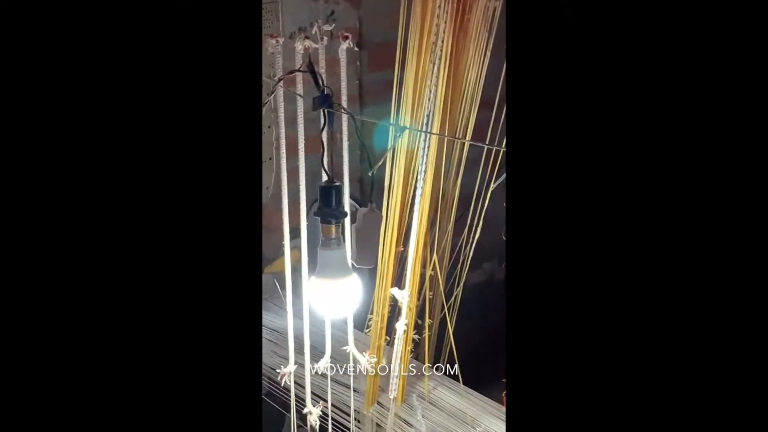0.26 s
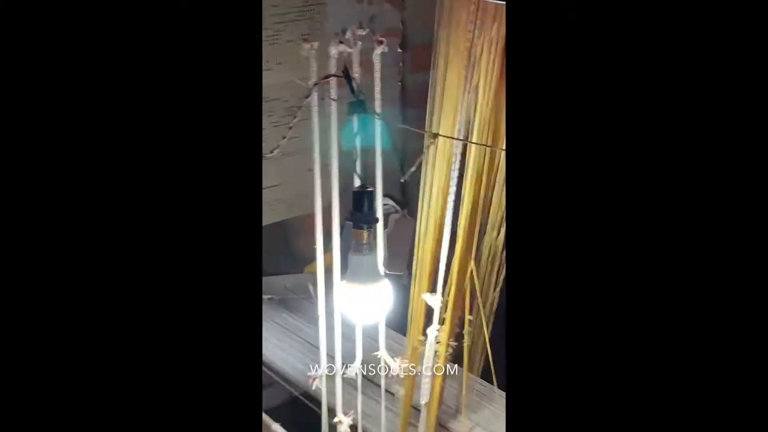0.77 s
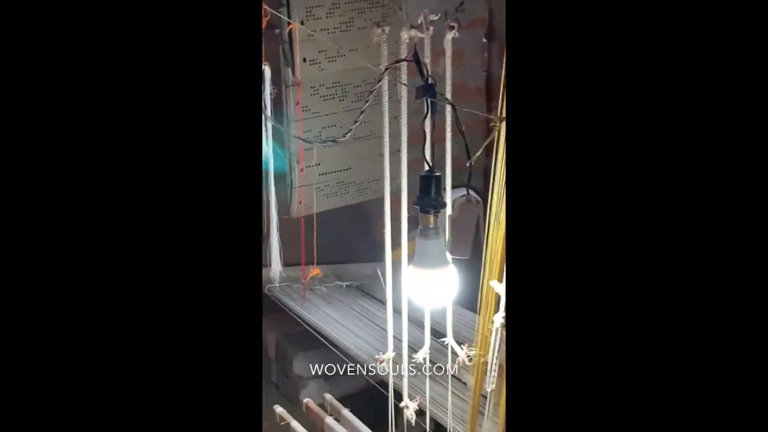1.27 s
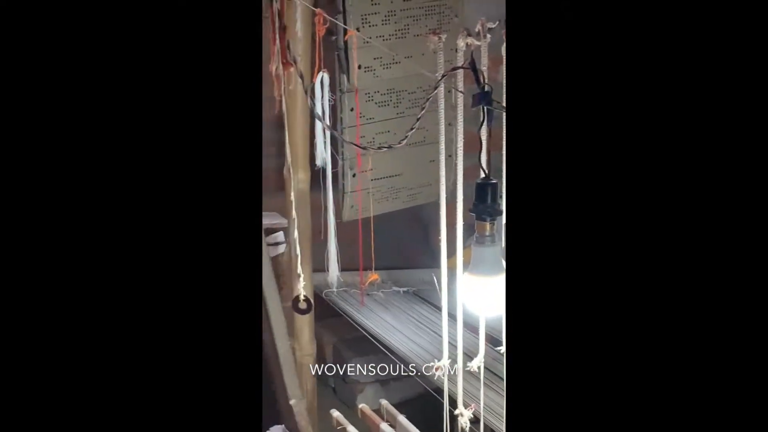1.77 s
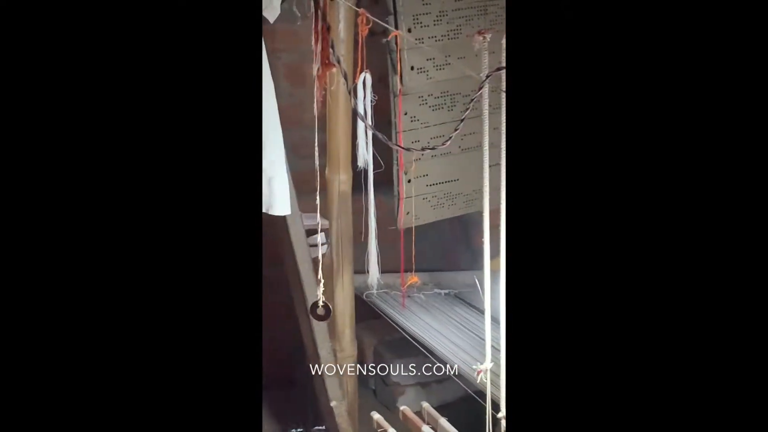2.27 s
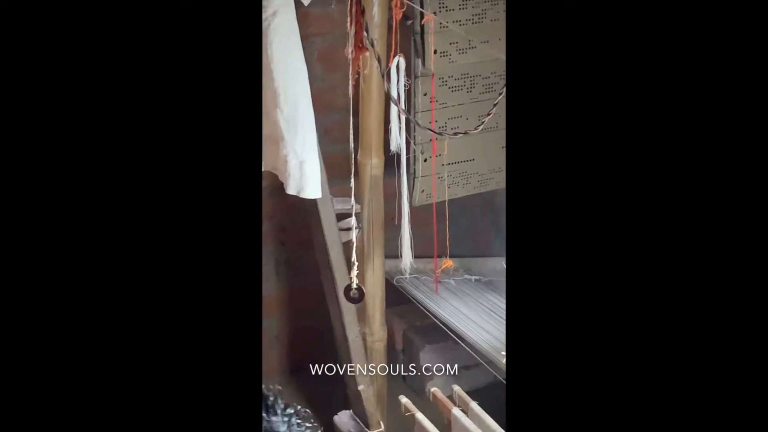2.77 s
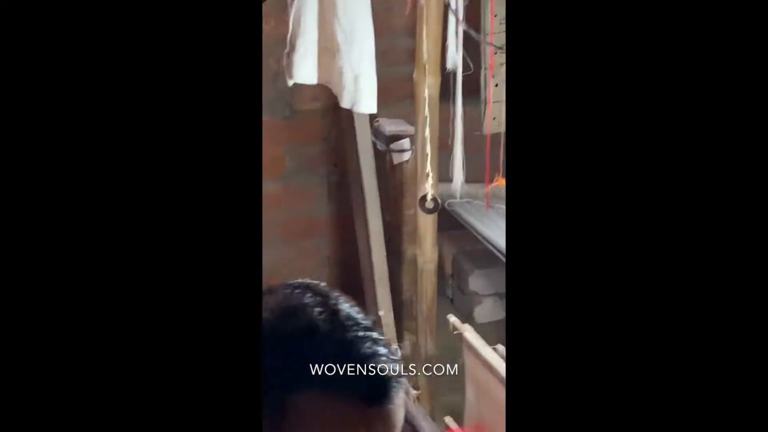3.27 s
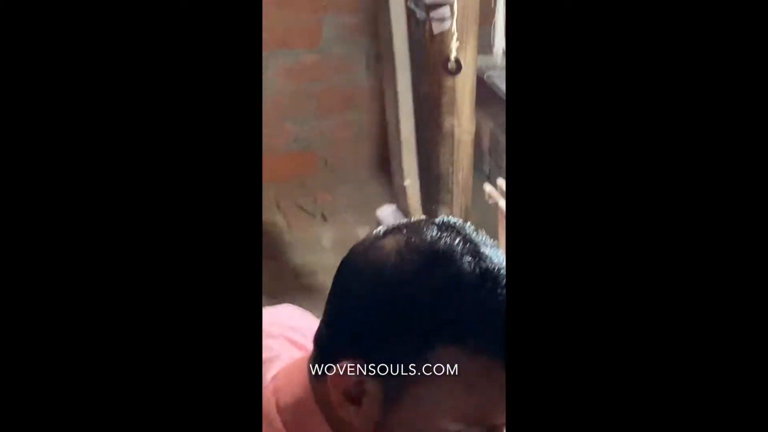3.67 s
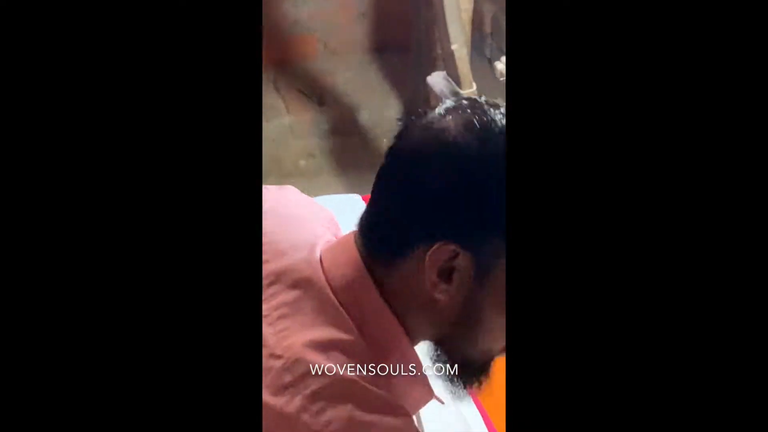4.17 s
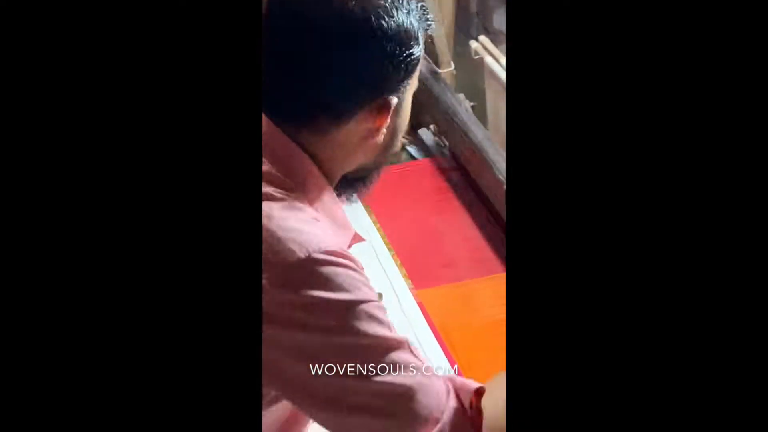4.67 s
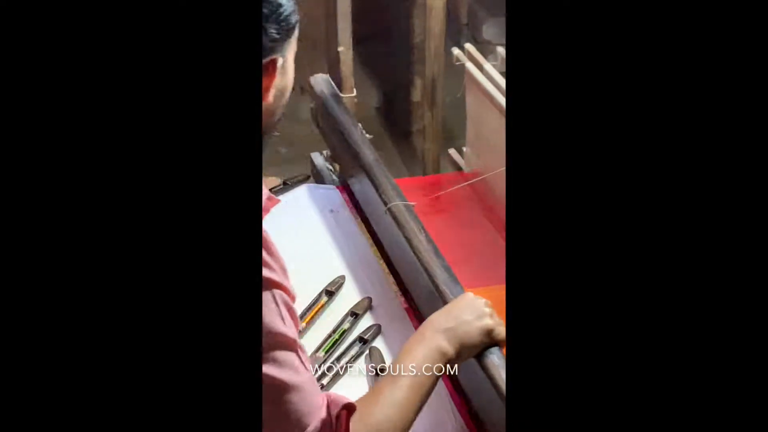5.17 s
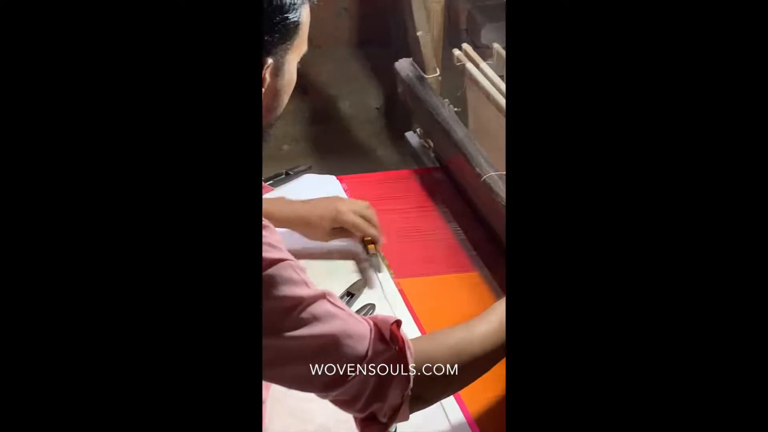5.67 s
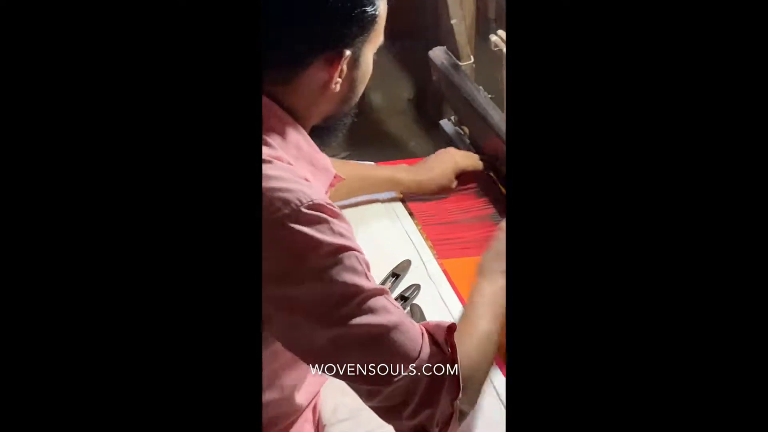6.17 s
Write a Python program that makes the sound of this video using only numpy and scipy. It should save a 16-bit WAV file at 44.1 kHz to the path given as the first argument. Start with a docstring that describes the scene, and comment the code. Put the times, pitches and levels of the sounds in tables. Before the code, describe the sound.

A wooden handloom is worked close by in a small brick workshop. Bright thread hiss swells into a heavy clattering blow with a low frame boom, then scattered knocks and a light metallic jingle. Another swish and clatter follow, then sparse sharp clacks, more jingling, and a busier final run of knocks and scrapes. Street rumble and faint motor hum stay underneath; a distant horn beeps weakly near the end. Handheld stereo microphone.

```python
"""Handloom in a brick workshop

A wooden handloom is worked indoors: warp threads hiss and scrape, beater, treadles and shuttles knock,
a taut cord squeals, small metal parts jingle and the frame booms. Outside a street rumbles, a motor hums
and a far horn sounds. Friction is filtered random grains, struck wood and metal are decaying modes,
frame and rumble are filtered noise, the hum is resonant noise and the horn a sum of sine orders."""
import sys
import numpy as np
from scipy import signal
from scipy.fft import rfft, irfft
from scipy.io import wavfile

SR = 44100
rng = np.random.default_rng(int(sys.argv[2]) if len(sys.argv) > 2 else 0)


def dump(signal):
    """Clip the signal to [-1, 1] and save it as 16-bit WAV at the path in sys.argv[1]."""
    limited = np.clip(np.atleast_2d(signal).T, -1, 1)
    pcm = np.round(limited * 32767).astype(np.int16)
    wavfile.write(sys.argv[1], SR, pcm)


N = 283122   # samples
HZ = np.maximum(np.arange(N // 2 + 1) * SR / N, 1)   # spectrum bins, kept off zero for the logarithm
TIME_S = np.arange(0, N + 20, 20) / SR   # envelopes are drawn at every 20th sample


def amp(db):
    """Level to linear amplitude: 20 dB is a factor of ten."""
    return 10 ** (np.asarray(db) / 20)


def rms_one(x):
    """Normalization by the root mean square, to unit rms."""
    return x / np.sqrt(np.mean(x ** 2) + 1e-20)


def at_hz(points, hz, axis=1):
    """Interpolation of one table column along a logarithmic frequency axis."""
    points = np.array(points)
    return np.interp(np.log(hz), np.log(points[:, 0]), points[:, axis])


def coloured(x, spectrum):
    """Spectral shaping: x is multiplied by a magnitude curve and brought to unit rms."""
    return rms_one(irfft(rfft(x) * amp(at_hz(spectrum, HZ)), N))


def band(x, low_hz, high_hz):
    """Band-pass filtering with Butterworth slopes."""
    return signal.sosfilt(signal.butter(2, [low_hz, high_hz], "band", fs=SR, output="sos"), x)


def drift(rate):
    """Slow random modulation of unit spread: noise through a double low-pass pole at rate hertz."""
    pole = np.exp(-80 * np.pi * rate / SR)   # at one value per 40 samples
    noise = rng.standard_normal(N // 40 + 2002)
    slow = signal.lfilter([1], [1, -2 * pole, pole * pole], noise)[2000:]
    return np.interp(np.arange(N) / 40, np.arange(len(slow)), rms_one(slow))


def grains(per_s, spread_db, size):
    """Stochastic impulse train: clicks of random time, strength and sign, at unit rms."""
    strength = amp(spread_db * np.minimum(rng.exponential(1, size), 5))
    signed = strength * rng.choice([-1, 1], size)
    return rms_one(signed * (rng.random(size) < per_s / SR) + 1e-9)


def ring(clicks, hz, t60):
    """Damped resonance: a unit click excites a sine of height 1 that loses 60 dB in t60 seconds."""
    decay = amp(-60 / (t60 * SR))
    turn = 2 * np.pi * min(hz, SR / 2.1) / SR
    return signal.lfilter([0, np.sin(turn)], [1, -2 * decay * np.cos(turn), decay * decay], clicks + 1e-18)


def gliding_ring(clicks, hz, t60):
    """Damped resonance of moving pitch: shift down, decay, shift back up."""
    turn = np.exp(2j * np.pi * np.cumsum(hz) / SR)
    return np.imag(turn * signal.lfilter([1], [1, -amp(-60 / (t60 * SR))], clicks / turn))


def swell(start, rise, hold, fall):
    """Envelope of height 1: a power-law rise, a hold, then exponential decay of 20 dB per fall time."""
    t = TIME_S - start
    return np.clip(t / rise, 0, 1) ** 0.86 * amp(-20 * np.clip((t - rise - hold) / fall, 0, 10))


def per_sample(envelope):
    """Linear interpolation of an envelope to every sample."""
    return np.interp(np.arange(N) / SR, TIME_S, envelope)


def street_rumble():
    """Broadband noise of fixed spectrum, its level wandering slightly."""
    # Each row: frequency in Hz, relative spectral density in dB.
    rumble_spectrum = [(25, -16), (35, -3), (70, -5), (120, 0), (170, 2.5), (300, -4.5), (620, -10.5),
                       (1450, -15.5), (2500, -57), (4300, -52), (7000, -45), (16000, -61)]
    rumble = coloured(rng.standard_normal(N), rumble_spectrum)
    return amp(-43.5 + 1.0 * drift(1.7)) * rumble


def motor_hum():
    """Narrow-band noise: random excitation of one resonance gives a wavering tone."""
    # A motor somewhere: frequency in Hz, bandwidth in Hz, rms level in dB.
    motor_resonance = (114, 11, -46.5)
    hz, width_hz, db = motor_resonance
    t60 = np.log(1000) / np.pi / width_hz   # bandwidth and decay time are reciprocal
    return amp(db) * rms_one(ring(rng.standard_normal(N), hz, t60))


def frame():
    """Low-frequency vibration: frame and floor boom as noise of about 45 to 100 Hz under swelling envelopes."""
    # Booms of frame and floor. Each row: start in seconds, level in dB.
    booms = [(0.9,-31.5),(1.16,-43),(1.74,-48),(2.7,-43.5),(2.83,-37),(2.96,-38.5),(3.47,-40.5),(3.93,-46),(4.18,-48.5),
             (4.6,-44),(4.82,-42),(5.08,-41),(5.3,-40.5),(5.56,-44),(5.92,-42),(6.08,-43)]
    rise_s, fall_s, steady_shake_db = .07, .22, -53   # fall: seconds per 20 dB
    level = amp(steady_shake_db) + sum(amp(db) * swell(s, rise_s, 0, fall_s) for s, db in booms)
    shake = band(band(rng.standard_normal(N), 45, 100), 42, 110)
    return per_sample(level) * rms_one(shake)


def threads():
    """Friction noise: thousands of tiny thread slips hiss, and sliding wood gives a duller scrape."""
    # Spectra of thread hiss and wood scrape. Each row: frequency in Hz, relative spectral density in dB.
    hiss_spectrum = [(1500, -22), (3000, -4), (4500, -1), (7000, 0), (10000, -2), (13000, -1), (16000, 0)]
    scrape_spectrum = [(200, -13), (500, 11), (1000, 15), (2000, 15.5), (3500, 10), (6000, -1),
                       (12000, -79)]
    # Slides of warp, shed and beater. Each row: start in seconds, rise in seconds, hold in seconds,
    # base time in seconds to fall 20 dB, thread hiss level in dB, wood scrape level in dB.
    slides = [(0.255,0.03,0.06,0.15,-66,-48),(0.52,0.16,0.069,0.18,-26.5,-39.5),(0.69,0.05,0.03,0.12,-28,-38),(0.764,0.014,0.035,0.09,-23,-36),
              (0.838,0.013,0.048,0.13,-23.5,-29.5),(1.0,.04,.01,.1,-39,-40),(1.05,0.012,0.05,.06,-23,-33),(1.1,.02,.03,.2,-32,-38),(1.15,0.093,.12,0.14,-26.5,-39),
              (1.49,0.017,0.0086,0.14,-44,-38),(1.647,.015,.04,0.23,-45,-51.5),(1.777,.1,.15,0.17,-43,-52),
              (2.23,0.046,0.047,1,-59,-56),(2.37,0.19,0.063,0.29,-25.5,-39),(2.684,0.04,0.03,0.27,-23,-35),(2.752,.01,.05,.2,-30,-29),
              (2.96,0.045,0.0091,0.13,-32,-40),(3.15,0.028,0.039,0.07,-42.5,-40.5),(3.2,.03,.05,.2,-52,-48),(3.33,0.05,.12,0.25,-55,-48),
              (3.5,.05,.08,.2,-60,-55),(3.6,0.042,0.14,0.6,-55,-48.5),(3.87,0.048,0.053,0.15,-53,-40.5),(4.098,0.006,.015,0.08,-40,-45),
              (4.152,.008,.003,0.05,-36,-55),(4.4,0.12,.1,0.12,-46,-59),(4.62,.05,.1,.3,-60,-60),(4.77,0.056,.03,0.4,-57,-59),
              (5.03,0.036,0.018,.2,-61,-51.5),(5.26,0.03,0.03,0.17,-48,-37),(5.535,0.015,0.045,0.1,-47.5,-52),
              (5.616,0.026,0.036,0.19,-23.5,-30.5),(5.82,.03,.04,0.2,-40,-39),(5.877,0.025,0.011,0.1158,-21.5,-24.5),
              (5.97,0.045,.04,0.18,-39,-39.5),(6.127,.01,.03,0.18,-38.5,-44.5)]
    rest_hiss_db, rest_scrape_db = -64, -58.5   # between slides the loom never quite rests
    scrape_lingers = 1.22   # the scrape's fall time against the hiss's
    bright_db, dulling, dull_above_hz = -25, 0.32, 8100   # dB lost at the top per dB below the bright level
    hiss_power, scrape_power = amp(rest_hiss_db) ** 2, amp(rest_scrape_db) ** 2
    for start, rise, hold, fall, hiss_db, scrape_db in slides:
        hiss_power = hiss_power + (amp(hiss_db) * swell(start, rise, hold, fall)) ** 2
        scrape_swell = swell(start, rise, hold, scrape_lingers * fall)
        scrape_power = scrape_power + (amp(scrape_db) * scrape_swell) ** 2
    hiss_level, scrape_level = np.sqrt(hiss_power), np.sqrt(scrape_power)

    slips = coloured(grains(9000, 1.3, size=N), hiss_spectrum)
    top = irfft(rfft(slips) / (1 + (dull_above_hz / HZ) ** 4), N)
    brightness = per_sample(np.minimum(hiss_level / amp(bright_db), 1) ** dulling)
    hiss = (slips - (1 - brightness) * top) * per_sample(hiss_level) * amp(2.34 * drift(13.6))
    scrape = coloured(grains(5000, 1.56, size=N), scrape_spectrum)
    return hiss + scrape * per_sample(scrape_level) * amp(2.7 * drift(17.2))


def knocks():
    """Impact excitation: a blow and the dying clatter of loose parts set wooden modes ringing."""
    # Each row: time in seconds, thud level in dB, ring frequency in Hz, ring strength in dB,
    # clatter t60 in seconds, low body level in dB, snap level in dB, crack level in dB,
    # gain of the crack's top octave in dB. The four part levels are nominal peaks.
    blows = [(0.236,-48,1170,-32,.25,-47,-58,-40,-6),(0.778,-34,1500,-34,.06,-45,-28,-18,0),(0.847,-26,1600,-26,.4,-42,-20,-24,-5),(0.868,-26,1500,-22,.2,-50,-40,-45,-5),
             (0.889,-16,1260,-32,.1,-18,-13,-28,-7),(0.8965,-10,1350,-32,.1,-10,-34,-33,-3),(0.905,-12,800,-34,.15,-19,-22,-35,-3),
             (0.919,-11,1100,-34,.2,-19,-37,-32,-5),(0.9245,-10,1040,-25,.09,-22,-34,-35,-3),(0.939,-20,1850,-34,.1,-22,-36,-40,-3),
             (0.961,-20,900,-38,.25,-22,-36,-37,-3),(0.984,-27,1000,-22,.15,-30,-45,-50,-3),
             (1.063,-32,1500,-34,.06,-45,-28,-18,0),(1.096,-23.5,1080,-32,.25,-29,-18,-25,-3),(1.237,-23,800,-24,.25,-24.5,-30,-32,1),
             (1.51,-15.5,1500,-32,.28,-29,-26.5,-31,-7),(1.549,-21,1400,-34,.3,-41,-46,-68,-3),(1.657,-33,1420,-32,.25,-42,-41,-35,-4),
             (2.712,-32,1100,-32,.2,-45,-23,-35,-3),(2.755,-24,2000,-38,.2,-45,-19,-30,-3),
             (2.761,-12,1050,-28,.1,-40,-10,-31,2),(2.766,-20,2500,-32,.12,-40,-14,-34,0),(2.774,-17,1050,-32,.2,-16,-22,-26,-5),(2.787,-20,1300,-34,.2,-15,-18,-40,-3),
             (2.8,-18,1600,-32,.25,-26,-17,-52,-3),(2.815,-19,1500,-36,.2,-20,-26,-45,-3),
             (2.847,-19,1500,-38,.2,-21,-21,-30,-8),(2.867,-21,1400,-38,.2,-22,-26,-36,-3),(2.992,-30,1020,-32,.25,-32,-28,-35,-1),
             (3.01,-29,2500,-24,.12,-40,-34,-45,-3),(3.079,-30,1400,-38,.15,-30,-45,-52,-3.5),(3.163,-35,974,-32,.25,-38,-35,-40,-3),(3.184,-35,970,-32,.15,-30,-27,-41,-5),
             (3.334,-37.5,1900,-32,.1,-43,-36,-58,-3),(3.352,-36,2200,-32,.12,-45,-35,-56,-3),(3.384,-31,885,-34,.2,-58,-32,-50,-8),(3.502,-23,825,-32,.25,-37,-57,-59.5,-3),
             (3.5255,-13,1180,-38,.22,-27,-48,-47,-5),(3.624,-36,1280,-32,.25,-32.5,-36,-49,-3),(3.699,-42,740,-32,.25,-48,-53,-55,-5),
             (3.754,-42,1800,-32,.1,-50,-46,-48,-3),(3.778,-34,2450,-24,.1,-52,-50,-58,-3),(3.817,-37,2450,-24,.1,-52,-52,-58,-3),
             (3.858,-31.5,1400,-32,.25,-52,-38,-48,-16),(3.868,-14,1460,-33,.25,-50,-14,-17.5,-21),
             (3.919,-16.5,1420,-33,.25,-49,-22,-15,-28),(3.937,-20.5,1590,-33,.25,-36.5,-21.5,-30,-20),(4.103,-25.5,1510,-30,.25,-36,-31,-30,-2),
             (4.113,-36,1500,-32,.06,-45,-31,-24,-3),(4.276,-36.5,1040,-32,.25,-40,-54,-56,-3),(4.443,-30,1500,-36,.18,-48,-33,-30,0),
             (4.567,-31,900,-38,.15,-39,-45,-38,-3),(4.583,-33,1300,-32,.15,-39,-45,-33,-3),(4.829,-47,1220,-32,.1,-37.5,-49,-45,-14),(5.155,-22,1050,-40,.2,-37,-57,-66,-8),
             (5.179,-17.5,1250,-42,.17,-34,-52,-65,-8),(5.234,-19,1600,-38,.1,-36,-22,-23,-13),(5.235,-14,760,-20,.13,-40,-40,-50,-9),(5.274,-16,1300,-36,.2,-21,-18,-22.5,-13),
             (5.276,-20,2850,-26,.1,-40,-30,-40,-12),(5.284,-15,1100,-36,.25,-20,-19,-32,-12),(5.3,-16,800,-34,.25,-17,-34,-34,-12),(5.318,-19,1200,-36,.25,-28,-34,-40,-12),
             (5.338,-21,1200,-32,.2,-26,-36,-45,-12),(5.36,-26,1100,-32,.25,-30,-48,-60,-8),(5.447,-33,710,-32,.2,-36,-48,-65,-8),
             (5.544,-43,738,-32,.25,-44,-39,-52,-3),(5.614,-27,1510,-32,.25,-45,-30,-48,-3),(5.643,-20,1590,-32,.25,-34,-23,-17,-2),
             (5.698,-21.5,1550,-32,.2,-30,-15,-27,-8),(5.891,-25.5,1350,-32,.2,-30,-18,-21,-11),(5.9145,-18,1510,-32,.2,-23,-17,-12,-7),
             (6.132,-28,1390,-32,.2,-44,-36,-23,1),(6.168,-50,1440,-32,.15,-42,-39,-24,3),(6.187,-15,1500,-36,.14,-59,-25.5,-22,-9),
             (6.199,-20,1250,-30,.15,-40,-43,-54,-3),(6.268,-31,1280,-36,.1,-45,-50,-27,-6)]
    # Modes of the wood. Each row: frequency in Hz, relative level in dB, t60 in seconds.
    wood_modes = [(333, -14.5, 0.15), (456.7, -4.5, 0.024), (500, 4.5, 0.047), (607, 2, 0.048),
                  (800, -6, 0.059), (895, -7, 0.048), (1059, 3.5, 0.028), (1190, -9, 0.019),
                  (1333, -28, 0.15), (1640, -5, 0.055), (1866, -4, 0.05), (2026, 4, 0.066),
                  (2450, 13, 0.011), (2964, 11, 0.015), (3480, 7.5, 0.0071)]
    wood_varies_db = 4
    ring_t60_s, crack_share = .03, .68   # the crack dies in this share of the clatter's time
    beam_hz, beam_db, beam_t60_s = (370, 520), -37, .04   # the beam rings somewhere in this range
    size = 16384
    out = np.zeros(N + size)
    t = np.arange(size) / SR
    click = 1. * (t == 0)
    modes = np.array([rfft(amp(db) * ring(click, hz, t60)) for hz, db, t60 in wood_modes])
    early = slice(0, round(SR / 100))
    contact = 1 + 1.5 * np.exp(-t / .006)   # the first touches are the hardest
    for s, thud_db, ring_hz, ring_db, clatter, body_db, snap_db, crack_db, top_db in blows:
        touches = grains(2400, 2.2, size=size) * contact
        touches[0] += 10.5   # the blow itself
        # each blow lands elsewhere, so the modes take new strengths
        strengths = amp(wood_varies_db * rng.standard_normal(len(wood_modes)))
        wood = 1 + 0.0053 * strengths @ modes
        clattering = touches * amp(np.maximum(-60 * t / clatter, -200))
        shaken = irfft(rfft(clattering) * wood, size)

        near_pitch = band(shaken, ring_hz / 1.8, ring_hz * 1.5)
        thud = band(near_pitch, ring_hz / 3.0, ring_hz * 2.2)
        thud = thud + amp(ring_db) * ring(shaken, ring_hz, ring_t60_s)
        beam = amp(beam_db) * ring(shaken, rng.uniform(*beam_hz), beam_t60_s)
        body = band(band(shaken, 260, 750) + beam, 200, 1100)
        snap = band(band(shaken, 2880, 4330), 2120, 5800)
        brief = touches * amp(np.maximum(-60 * t / (crack_share * clatter), -200))
        crack = band(band(brief, 4300, 8500), 3500, 9500)
        crack = crack + amp(top_db) * band(brief, 8500, 17000)
        for part, db in (thud, thud_db), (body, body_db), (snap, snap_db), (crack, crack_db):
            # peaks stand about three times above the early rms
            out[round(s * SR):][:size] += amp(db) * part / (3 * part[early].std())
    return out[:N]


def squeals():
    """Friction-driven resonance: dense slips excite one high mode of a taut cord."""
    # Each row: start in seconds, hold in seconds, seconds to fall 20 dB, frequency in Hz, level in dB.
    cord_squeals = [(0.772,.035,.03,14700,-25),(1.057,.012,.04,14900,-31),(2.875,.015,.02,14200,-38)]
    width_hz, rise_s = 900, .006
    out = np.zeros(N)
    for start, hold, fall, hz, db in cord_squeals:
        slips = ring(grains(8000, 2.5, size=N), hz, np.log(1000) / np.pi / width_hz)
        out += amp(db) * rms_one(slips) * per_sample(swell(start, rise_s, hold, fall))
    return out


def jingle():
    """Modal ringing of struck metal: quick uneven touches excite short modes over a bright tick."""
    # Runs of jingling metal. Each row: start in seconds, hold in seconds, seconds to fall 20 dB,
    # relative ring level in dB, relative bright rush level in dB, main mode in Hz, its glide in Hz/s,
    # upper mode in Hz.
    runs = [(1.655,.06,.1,-60,-56,6100,-300,11300),(1.785,.07,.05,-46,-41,6900,900,12200),
            (1.86,.19,.06,-41,-44,7150,900,12100),(2.195,.03,.05,-60,-75,6750,0,11800),(2.257,.06,.5,-66,-61,7040,-100,11800),
            (4.165,.19,0.23,-37,-40.5,7050,-160,11200),(6.184,.02,0.01,-44,-43,6400,10,10430)]
    # Single clinks. Each row: time in seconds, relative strength in dB.
    clink_hits = [(1.657,-28),(1.672,-30),(1.702,-30),(1.788,-17),(1.794,-16),(1.8003,-14),(1.8457,-19),(1.8525,-16),(1.8773,-11),(1.8882,-8),
                  (1.9305,-15),(1.9536,-10),(1.9626,-11),(1.998,-7),(2.008,-15),(2.0502,-8),(2.0594,-12),
                  (1.869,-18),(1.975,-18),(2.042,-19),(2.265,-34),(2.273,-34),(2.307,-30),
                  (4.1698,-21),(4.1798,-1),(4.1965,-6),(4.2105,-15),(4.2471,-15),(4.2587,-12),(4.2865,-16),(4.2985,-17),(4.3265,-15),
                  (4.3529,-18),(4.3805,-15),(4.399,-19),(4.4098,-9),(4.4245,-19),(4.438,-14),(4.493,-25),(4.522,-27),(4.549,-25),
                  (6.1873,-4),(6.193,-7)]
    # Partials around the main and upper modes. Each row: frequency multiple, relative level in dB,
    # t60 in seconds.
    main_modes = [(.565, -33, 0.023), (0.961, -39, 0.033), (1.0, -17.5, .016), (1.03, -26, 0.019)]
    upper_modes = [(.96, -27.5, 0.011), (1.0, -15, 0.0094), (1.05, -20.5, .005), (1.3, -11, 0.0018)]
    rise_s, chatter_s, chatter_gain = 0.0057, .0025, .08   # a clink chatters on for a moment
    out, loud = np.zeros(N), np.zeros(N)
    signs = rng.choice([-1, 1], len(clink_hits))
    loud[[round(s * SR) for s, db in clink_hits]] = amp(np.array(clink_hits)[:, 1]) * signs
    chatter = signal.lfilter([chatter_gain], [1, -np.exp(-1 / (chatter_s * SR))], np.abs(loud))
    loud = .8 * loud + chatter * grains(6000, 2.0, size=N)
    ends = [row[0] for row in runs[1:]] + [N / SR]   # a clink belongs to the run under way
    for (start, hold, fall, ring_db, rush_db, main_hz, glide, upper_hz), end in zip(runs, ends):
        run = slice(round(start * SR), min(N, round((start + hold + 3 * fall) * SR)))
        level = per_sample(swell(start, rise_s, hold, fall)) * amp(3.0 * drift(60))
        touches = (grains(5500, 3.0, size=N) * level)[run]
        t = np.arange(len(touches)) / SR
        clinks = loud[run] * (start + t < end)
        out[run] += band(amp(rush_db) * touches + 0.6 * clinks, 5500, 18000)
        wander = 1 + .015 * drift(12)[run]   # the modes wander in pitch
        strikes = amp(ring_db) * touches + clinks
        for pitch, modes in (main_hz + glide * t, main_modes), (upper_hz + 0 * t, upper_modes):
            for multiple, db, t60 in modes:
                # each touch lands elsewhere, so each mode is struck with a strength of its own
                strength = amp(db + 3 * rng.standard_normal(len(pitch)))
                out[run] += gliding_ring(strikes * strength, multiple * pitch * wander, t60)
    return band(out, 4600, 20000)


def horn():
    """Harmonic synthesis: a far horn heard through its upper orders, with slight frequency modulation."""
    # Blasts. Each row: start in seconds, hold in seconds, level in dB.
    horn_blasts = [(5.093,0.06,-55.5),(5.33,.1,-52),(5.46,0.11,-47),(6.235,0.11,-49),(6.398,.02,-40.5)]
    # Upper orders, which carry farthest. Each row: multiple of the fundamental, relative level in dB.
    orders = [(7, -14), (8, 0), (9, -1), (10, -16)]
    fundamental_hz, rise_s, fall_s = 382, .03, 0.033   # fall: seconds per 20 dB
    blasts = sum(amp(db) * swell(s, rise_s, hold, fall_s) for s, hold, db in horn_blasts)
    turns = np.cumsum(fundamental_hz * (1 + .0015 * drift(15))) / SR
    tone = sum(amp(db + 2.2 * drift(11)) * np.sin(2 * np.pi * k * turns) for k, db in orders)
    return per_sample(blasts) * tone


def echoes(t60, cut_hz):
    """Diffuse reverberation: the response of exponentially dying noise, energy 1, dulled by the walls."""
    tail = rng.standard_normal(N) * amp(np.maximum(-60 * np.arange(N) / SR / t60, -200))
    return rfft(tail / np.sqrt(np.sum(tail ** 2))) / (1 + 1j * HZ / cut_hz)


def workshop():
    """Superposition, as a spectrum: loom sounds direct and off the walls, frame and street direct only."""
    room_t60_s, room_db, wall_cut_hz = 0.29, -2, 1150
    loom = rfft(threads() + knocks() + squeals() + jingle())
    outside = street_rumble() + motor_hum() + horn()
    return loom * (1 + amp(room_db) * echoes(room_t60_s, wall_cut_hz)) + rfft(frame() + outside)


def scene():
    """Interchannel coherence: a shared part, and a part of the same course with its own fine detail."""
    # The two channels. Each row: frequency in Hz, likeness from 0 to 1, left minus right level in dB.
    channel_likeness = [(60, .999, .7), (125, .993, 2), (250, .97, 3.3), (450, .82, 3.3), (900, .1, 1.3),
                        (1500, .55, .2), (2600, .3, .2), (3600, .75, .2), (4600, .95, .1), (16000, .97, 0)]
    shared, unlike = workshop(), workshop()
    alike, balance_db = at_hz(channel_likeness, HZ), at_hz(channel_likeness, HZ, axis=2)
    mid = np.sqrt((1 + alike) / 2) * shared
    side = np.sqrt((1 - alike) / 2) * unlike
    return irfft([(mid + side) * amp(balance_db / 2), (mid - side) * amp(-balance_db / 2)], N)


def record(dry):
    """Interchannel phase and low-pass filtering: the right channel is phase-shifted, the top is cut."""
    # Phase of right against left; in the treble about a plain delay of a quarter millisecond.
    # Each row: frequency in Hz, phase in radians.
    right_phase = [(0, 0), (250, .15), (600, 1.2), (950, 2.5), (1300, 0), (2100, -.9), (3000, -.9),
                   (4650, -3.14), (8850, -9.42), (13150, -15.7), (17000, -21.4)]
    cutoff_hz = 16150   # from here up the loss is at least 60 dB
    hz, radians = np.transpose(right_phase)
    right = irfft(rfft(dry[1]) * np.exp(1j * np.interp(HZ, hz, radians)), N)
    return signal.sosfilt(signal.cheby2(20, 60, cutoff_hz, fs=SR, output="sos"), [dry[0], right])


dry = scene()
out = record(dry)
dump(out)
```